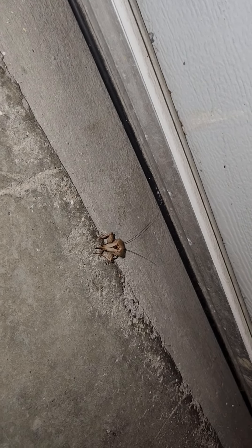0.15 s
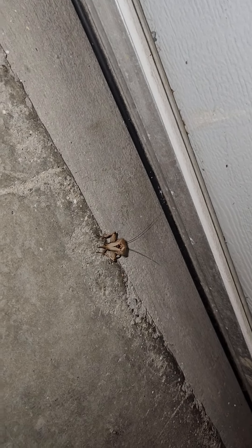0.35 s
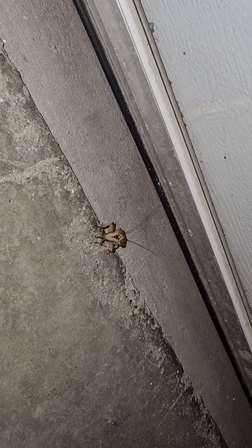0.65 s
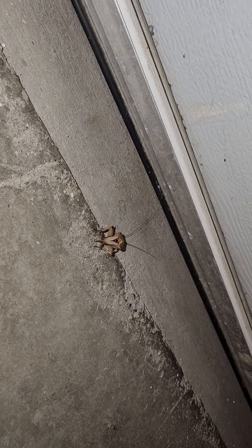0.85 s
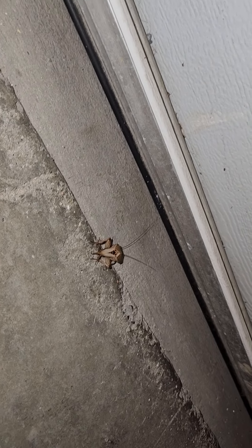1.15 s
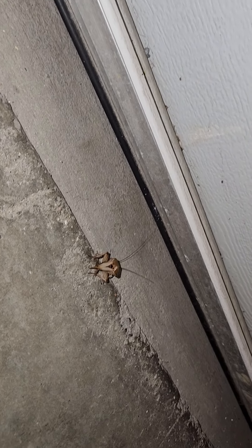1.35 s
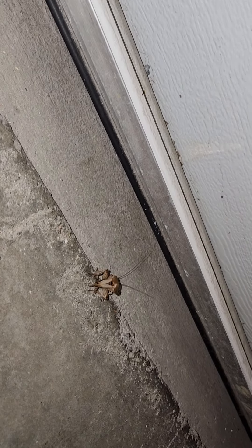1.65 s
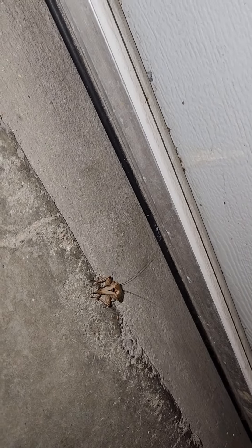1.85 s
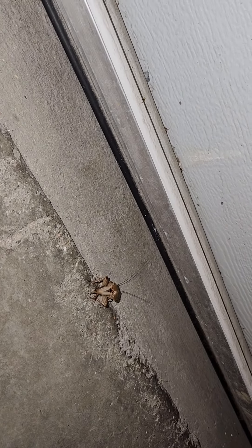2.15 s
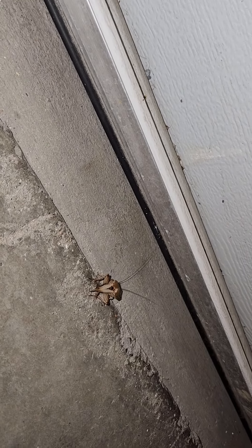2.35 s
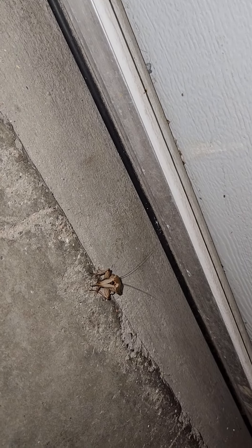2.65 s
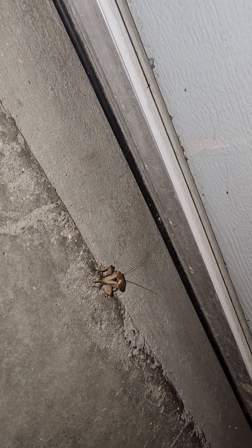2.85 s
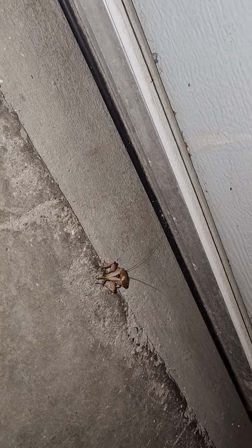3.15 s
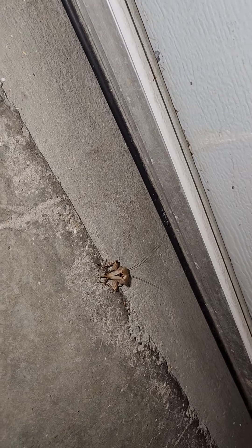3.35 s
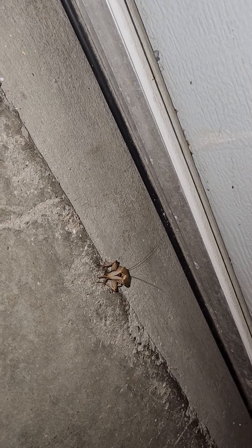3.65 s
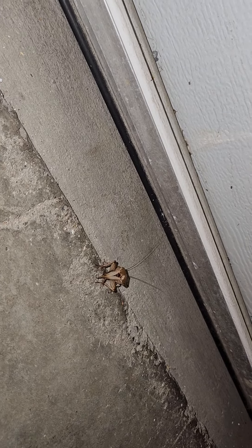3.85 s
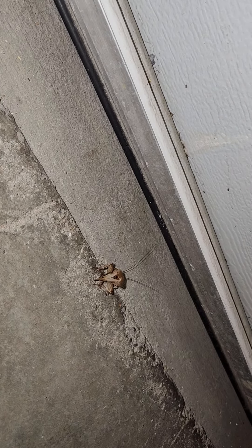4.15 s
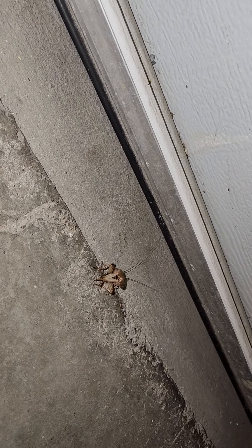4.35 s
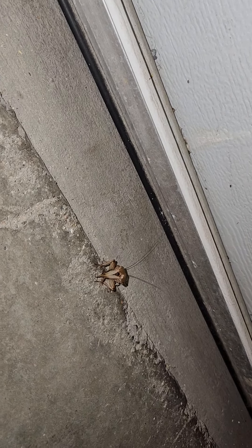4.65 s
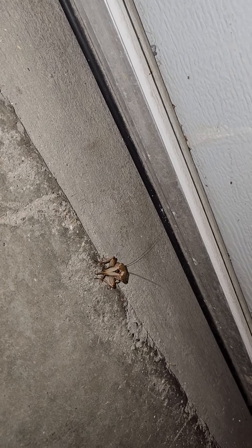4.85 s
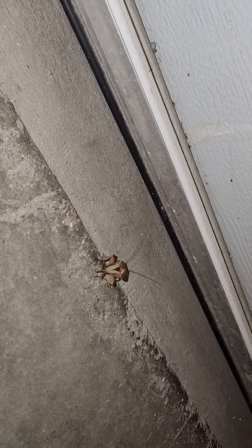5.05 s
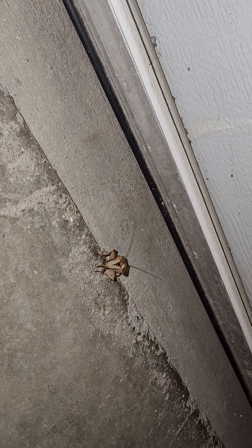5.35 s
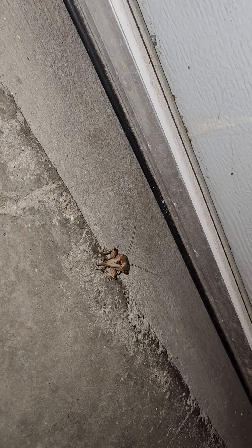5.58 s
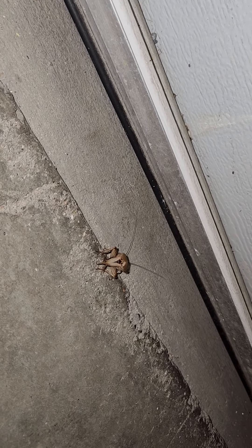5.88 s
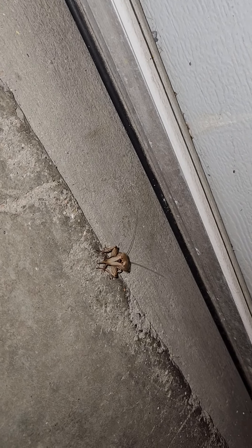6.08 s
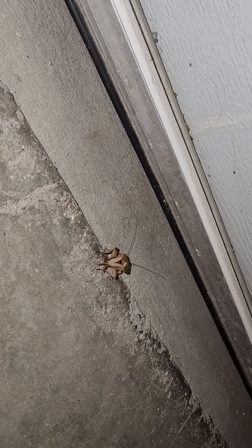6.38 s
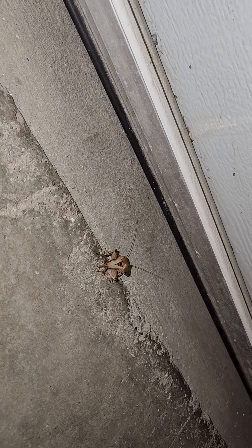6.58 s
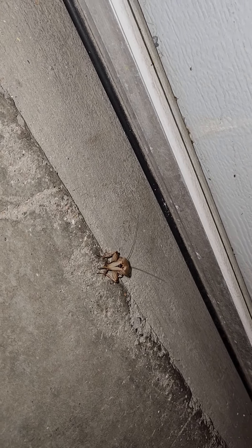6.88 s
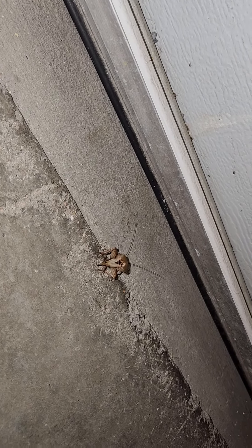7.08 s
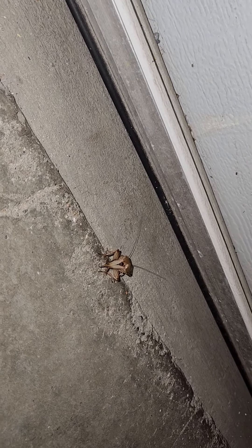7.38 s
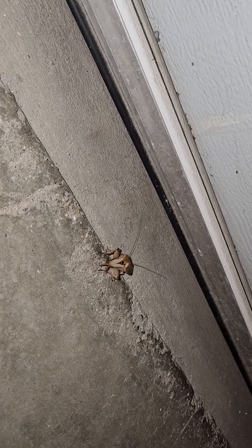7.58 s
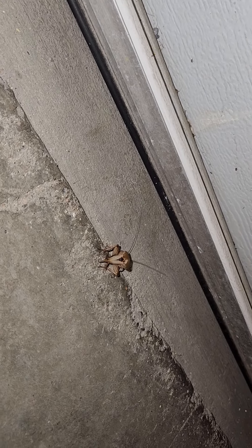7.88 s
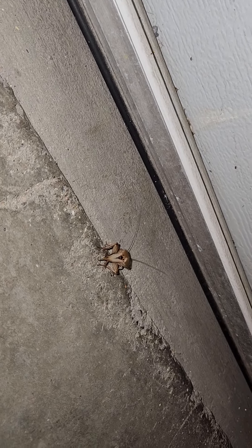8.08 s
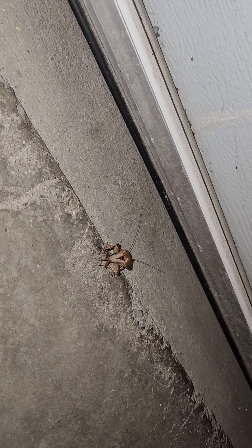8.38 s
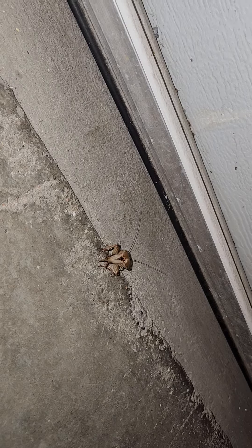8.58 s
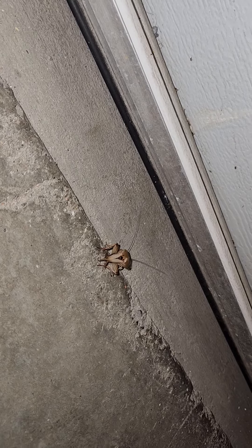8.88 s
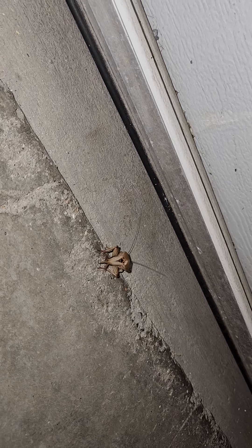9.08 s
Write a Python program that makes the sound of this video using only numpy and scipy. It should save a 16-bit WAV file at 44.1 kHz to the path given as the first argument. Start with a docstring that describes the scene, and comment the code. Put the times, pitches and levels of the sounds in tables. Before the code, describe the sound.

Steady, high cricket chirps ring out indoors at close range, with dull room noise and a few soft low bumps underneath.

```python
"""Bright, ringing cricket chirps, about five a second, close to a hand-held stereo microphone.
The cricket sits on a concrete floor by a door frame. Each chirp is a faint opening scrape, then four
to six closings of the wings: a scraper runs along a file and sets the wing ringing near 5.2 kHz.
The hard room rings on between chirps. Underneath lie dull room noise, a motor's hum,
a few low bumps and one faint far whistle."""
import sys
import numpy as np
from scipy import signal
from scipy.fft import rfft, irfft, next_fast_len
from scipy.io import wavfile

SR = 44100
rng = np.random.default_rng(int(sys.argv[2]) if len(sys.argv) > 2 else 0)


def store_wav(level_fs):
    """Save 16-bit WAV to argv[1]."""
    pcm = np.round(np.clip(np.atleast_2d(level_fs), -1, 1) * 32767)
    wavfile.write(sys.argv[1], SR, pcm.T.astype(np.int16))


N = 407043
FFT_SIZE = next_fast_len(N, real=True)
FFT_HZ = np.fft.rfftfreq(FFT_SIZE, 1 / SR)
WING_HZ, WING_WIDTH_HZ = 5062, 810  # resonance of the wing
RASP_DB = -32  # base level of the teeth's rasp

# the microphone sways in the beam of the song: t/s, tone gain/dB, lag of the right channel/ms
MIC_SWAY = [(0.2, -6.5, 0.073), (0.85, -6.5, 0.087), (1.85, -7, 0.042), (2.7, -8, 0.048),
            (3.4, -6.5, 0.057), (4.7, -7.5, 0.055), (5.6, -6.5, .065), (9.2, -6.5, 0.068)]


def from_db(db):
    """Decibels to gain."""
    return 10 ** (np.asarray(db) / 20)


def rms_one(x):
    """Scale to rms 1."""
    return x / np.sqrt(np.mean(np.abs(x) ** 2) + 1e-20)


def panned(x, db):
    """Left and right, `db` apart."""
    return np.array([x * from_db(db / 2), x * from_db(-db / 2)])


def at_hz(curve, hz):
    """Read a curve on a log-frequency axis."""
    knots_hz, values = np.transpose(curve)
    return np.interp(np.log(np.maximum(hz, 1)), np.log(knots_hz), values)


def colour(x, spectrum, channel_gain=1):
    """Shape white noise at equal power, then apply a gain per channel and frequency."""
    shape = rms_one(from_db(at_hz(spectrum, FFT_HZ)))
    return irfft(rfft(x, FFT_SIZE) * shape * channel_gain, FFT_SIZE)[..., :N]


def drift(rate):
    """A random wander of rms 1 that takes a new value `rate` times a second."""
    place = np.arange(N) * rate / SR
    values = rng.standard_normal(int(place[-1]) + 2)
    return rms_one(np.interp(place, np.arange(len(values)), values))


def phase_of(hz):
    """Running phase of a moving frequency."""
    return 2 * np.pi * np.cumsum(hz) / SR


def span(middle_s, length_s):
    """The samples of a short event, and how far along it each one is (0-1)."""
    at = np.arange(int((middle_s - length_s / 2) * SR), int((middle_s + length_s / 2) * SR))
    inside = (at >= 0) & (at < N)
    return at[inside], np.linspace(0, 1, len(at))[inside]


def room_tone(level_db=-47):
    """A bed of dull noise, centred in the bass and wide higher up."""
    # spectrum of the room noise: f/Hz, relative density/dB
    spectrum = [(20, -18.5), (45, -10.5), (62, -3), (95, -1), (165, -10.5), (260, -12.5), (420, -16.5),
                (650, -25), (1000, -33), (1500, -32), (2200, -47), (3200, -65), (8000, -49), (16000, -65)]
    # likeness of left and right: f/Hz, correlation
    likeness = [(60, 0.97), (150, 0.99), (300, 0.79), (500, 0.3), (800, 0.038), (16000, 0)]
    alike = at_hz(likeness, FFT_HZ)
    mid_side_gain = np.sqrt(np.array([1 + alike, 1 - alike]) / 2)
    mid, side = colour(rng.standard_normal((2, N)), spectrum, mid_side_gain)
    return from_db(level_db) * np.array([mid + side, mid - side])


def motor_hum(waver=0.33, wander_hz=14):
    """A motor's steady partials, each wavering a little in pitch and level."""
    # motor partials: f/Hz, rms level/dB, pitch wander/Hz, left minus right/dB
    partials = [(91.1, -50, 3.21, 0.5), (116.8, -54, 3.08, 2), (141.9, -58, 2.5, 2.5), (214, -66.5, 1.6, 3),
                (268.8, -56.5, 2.1, 2), (284.8, -56, 1.76, 1), (357.4, -62.5, 2.185, 8),
                (486, -73.5, 3.74, 4), (562, -81, 1.34, -12), (1250, -83, 2.26, 7), (1480, -82.5, 2.5, -24),
                (1940, -87, 3.9, 2), (3555, -88, 20, 14)]
    step = 5  # the partials are low, so every fifth sample carries them
    t = np.arange(0, N, step) / SR
    knots, out = np.arange(int(t[-1] * wander_hz) + 2), 0
    for hz, db, width_hz, pan_db in partials:
        wander = np.interp(t * wander_hz, knots, rng.standard_normal(len(knots)))
        swell = np.interp(t * wander_hz, knots, rng.standard_normal(len(knots)))
        partial = (1 + waver * swell) * np.sin(step * phase_of(hz + width_hz * wander))
        out = out + panned(from_db(db) * rms_one(partial), pan_db)
    return signal.resample_poly(out, step, 1, axis=1)[:, :N]


def low_bumps(pitch_spread=0.2):
    """Soft swells of rumble, each a low tone of unsteady pitch."""
    # bumps: middle t/s, rms level at the crest/dB, f/Hz, length/s
    swells = [(1.713, -41, 70, .35), (1.93, -39, 75.4, 0.38), (2.146, -40.5, 71.3, 0.33),
              (2.28, -44, 36, 0.29), (5.502, -41.5, 73.4, .55), (6.882, -45, 66.3, 0.63),
              (9.169, -43.5, 66.5, 0.27)]
    out, wander = np.zeros(N), 1 + pitch_spread * drift(35)
    for s, db, hz, length in swells:
        at, along = span(s, length)
        swell = from_db(db) * np.sin(np.pi * along) ** 2
        out[at] += swell * np.sqrt(2) * np.sin(phase_of(hz * wander[at]))
    return out


def far_whistle(start_s=1.07, attack_s=0.054, hold_s=0.17, release_s=0.2, level_db=-69,
                note_hz=1808, scoop_hz=110, settle_s=0.043, blur_hz=22, flutter=0.48):
    """A faint note that drops onto its pitch, holds and fades, blurred by distance."""
    length = attack_s + hold_s + release_s
    at, along = span(start_s + length / 2, length)
    t, out = along * length, np.zeros(N)
    envelope = np.interp(t, [0, attack_s, attack_s + hold_s, length], [0, 1, 1, 0])
    level = from_db(level_db) * envelope * (1 + flutter * drift(70.5)[at])
    hz = note_hz + scoop_hz * np.exp(-t / settle_s) + blur_hz * drift(200)[at]
    out[at] = level * np.sqrt(2) * np.sin(phase_of(hz))
    return out


def room_reverb(x, frame_db=-19, frame_s=0.011, early_db=-22, early_s=0.017, tail_db=-16.5):
    """Echoes off the door frame, then the nearest walls, then a tail that rings longest near 5 kHz."""
    # ring of the hard room: f/Hz, t60/s
    t60 = [(1000, 0.13), (5200, 1), (8000, 0.3), (11000, 0.41), (13000, 0.55), (16000, 0.25)]
    t = np.arange(SR) / SR
    hz = np.fft.rfftfreq(len(t), 1 / SR)
    white = rfft(rng.standard_normal((2, len(t))))
    edges, tail = np.linspace(0, SR / 2, 12), 0
    for low, high in zip(edges, edges[1:]):
        band = irfft(white * ((hz >= low) & (hz < high)), len(t))
        tail = tail + band * from_db(-60 * t / at_hz(t60, (low + high) / 2))
    frame = rng.standard_normal(tail.shape) * np.exp(-t / frame_s) * (t > .0018)
    early = rng.standard_normal(tail.shape) * np.exp(-t / early_s) * (t > .007)
    song_band, response = np.abs(hz - WING_HZ) < 150, 0
    for part, db in ((frame, frame_db), (early, early_db), (tail * (t > .012), tail_db)):
        # each echo's gain is set at the pitch of the song
        strength = np.sqrt(np.mean(np.abs(rfft(part)[:, song_band]) ** 2, axis=1, keepdims=True))
        response = response + from_db(db) * part / strength
    # the song is already under way: one chirp of pre-roll leaves the room ringing
    pre_roll = x[:, int(.15 * SR):int(.27 * SR)]
    wet = signal.fftconvolve(np.hstack([pre_roll, x]), response, axes=1)
    return wet[:, pre_roll.shape[1]:][:, :N]


def wall_slaps(x):
    """Single slaps off the far walls, reaching left and right at slightly different times."""
    # wall echoes: delay/s, gain/dB
    slaps = [(0.038, -22), (.0598, -33.5)]
    out = np.zeros((2, N))
    for delay, db in slaps:
        lags = ((delay + rng.uniform(0, .0003, 2)) * SR).astype(int)
        for side, lag in enumerate(lags):
            out[side, lag:] += from_db(db) * x[side, :-lag]
    return out


def chirps():
    """One row per chirp: t/s, strokes, gain from the microphone's sway/dB."""
    # rhythm of the song: first stroke t/s, number of strokes
    rhythm = [(0.1966, 5), (0.4052, 5), (0.6416, 5), (0.8543, 5), (1.0598, 5), (1.261, 5), (1.4615, 5),
              (1.6554, 5), (1.8708, 5), (2.1001, 5), (2.4683, 4), (2.7842, 4), (2.977, 5), (3.1801, 5),
              (3.4032, 5), (3.6039, 5), (3.7943, 5), (3.9884, 5), (4.1854, 6), (4.3839, 5), (4.585, 5),
              (4.7758, 5), (4.971, 5), (5.1629, 5), (5.346, 5), (5.5484, 5), (5.7409, 5), (5.9374, 5),
              (6.1439, 5), (6.349, 5), (6.5446, 5), (6.7356, 5), (6.9463, 5), (7.1461, 5), (7.3382, 5),
              (7.538, 5), (7.7327, 6), (7.9635, 5), (8.1573, 6), (8.3726, 5), (8.5818, 5), (8.7666, 6),
              (8.9677, 5), (9.1768, 5)]
    s, db, _ = np.transpose(MIC_SWAY)
    return [(start, count, np.interp(start, s, db)) for start, count in rhythm]


def strokes(spacing_s=.0108, slowing=0.079, growth_db=1.5):
    """Wing closings slow down and press harder through a chirp: t/s, drive/dB, rasp/dB, index."""
    rows = []
    for start, count, db in chirps():
        place = np.arange(count)
        lag = place + slowing * place * (place - 1) / 2
        length = spacing_s * place[-1]
        for k in place:
            effort_db = growth_db * (k / place[-1] - .5)
            rows.append((start + length * lag[k] / lag[-1], db + effort_db, RASP_DB + effort_db, k))
    return rows


def wing_opening(level_db=-36, ahead_s=0.0079, length_s=0.014, attack_s=.003, fade_db=9, uneven_db=5.5):
    """The wings part with a faint tick that trails off in a scrape just before the first stroke."""
    # spectrum of the tick: f/Hz, relative density/dB
    spectrum = [(1000, -23), (3000, -14), (4300, 2.5), (5250, 14.5), (6200, 4), (7500, 4), (9400, -13),
                (11000, -24), (15700, -19)]
    rows, touch = chirps(), np.zeros(N)
    chances = rng.standard_normal((len(rows), 2)).clip(-1.5, 1.5)
    for (start, _, db), (timing, accent) in zip(rows, chances):
        at, along = span(start - ahead_s + 0.0011 * timing, length_s)
        attack = np.minimum(along * length_s / attack_s, 1)
        touch[at] = attack * from_db(db + level_db + 2 * accent - fade_db * along)
    scrape = touch * from_db(uneven_db * drift(400)) * rng.standard_normal((2, N))
    return colour(scrape, spectrum) * from_db([[-1.5], [1.5]])  # leans right


def file_brush(drive_db=-24, rasp_db=-15, ahead_s=0.0082, length_s=0.0033, tooth_hz=5150):
    """One beat before a chirp the scraper grazes the file; returns wing drive and rasp envelope."""
    drive, rasp = np.zeros(N, complex), np.zeros(N)
    for start, _, db in chirps():
        accent, detune, timing = rng.standard_normal(3)
        at, along = span(start - ahead_s + 0.0011 * timing, length_s)
        hz = np.full(len(at), tooth_hz + 120 * detune)
        press = from_db(3 * accent) * np.sin(np.pi * along)
        drive[at] = from_db(db + drive_db) * press * np.exp(1j * phase_of(hz))
        rasp[at] = from_db(RASP_DB + rasp_db) * press
    return drive, rasp


def scraper(tooth_hz=5234, first_s=0.0082, later_s=0.0075, first_sag_hz=480, later_sag_hz=380,
            slip_width=0.066, slip_loss_db=4.5):
    """The scraper strikes the file's teeth at each closing; returns wing drive and rasp envelope."""
    rows, drive, rasp = strokes(), np.zeros(N, complex), np.zeros(N)
    chances = rng.standard_normal((len(rows), 8)).clip(-1.6, 1.6)
    for (s, db, rasp_db, k), chance in zip(rows, chances):
        stretch, detune, stumble, stumble_shift, jump, jump_shift, accent, roughness = chance
        if k == 0:  # the first stroke glides cleanly down
            length = first_s
            at, along = span(s - .0003, length)
            hz = tooth_hz + 50 - first_sag_hz * along ** 4
            skip_rad = 0
            press = from_db(1.3) * np.abs(np.sin(np.pi * along)) ** 1.16
            rasp_db -= 11
        else:  # later ones stumble early, then jump ahead of the wing past the middle and lose grip
            length = later_s * np.exp(.12 * stretch)
            at, along = span(s + .0007, length)
            hz = tooth_hz + 25 * detune - later_sag_hz * along ** 3
            stumbled = (1 + np.tanh((along - 0.15 - 0.13 * stumble_shift) / slip_width)) / 2
            jumped = (1 + np.tanh((along - 0.57 - 0.037 * jump_shift) / slip_width)) / 2
            skip_rad = 0.91 * stumble * stumbled + (1.68 + 0.87 * jump) * jumped
            press = np.abs(np.sin(np.pi * along ** 0.78)) * from_db(1.53 - slip_loss_db * jumped)
        force = from_db(db + 0.47 * accent) * np.sqrt(later_s / length) * press
        drive[at] += force * np.exp(1j * (phase_of(hz) + skip_rad + rng.uniform(0, 2 * np.pi)))
        # the rasp is there from first contact, before the wing has rung up
        rasp[at - round(.0009 * SR)] += from_db(rasp_db + 1.4 * roughness) * press ** 0.065
    return drive, rasp


def tooth_rasp(envelope, grain_db=3, alike=0.25):
    """Uneven teeth add a gritty noise, in grains under a millisecond long."""
    # rasp of the file teeth: f/Hz, relative density/dB
    spectrum = [(900, -13.5), (2200, -19.5), (2800, -14.5), (3400, -17), (4400, -1), (5300, -6.5),
                (6400, 6.5), (7800, -1), (9400, -14), (10600, -6.5), (11600, -3.5), (12800, -9),
                (14400, -3), (15700, 4)]
    # the two microphone ports colour the rasp differently: f/Hz, left minus right/dB
    ports = [(1500, -1), (2900, 3), (4600, 2), (6200, 12), (7700, -13.5), (9200, 5.5), (10600, 5.5),
             (11600, -4), (14500, -3), (15700, -1)]
    noise = np.sqrt(alike) * rng.standard_normal(N) + np.sqrt(1 - alike) * rng.standard_normal((2, N))
    grains = rms_one(from_db(grain_db * drift(1500)))
    return colour(noise * envelope * grains, spectrum, panned(0.9, at_hz(ports, FFT_HZ)))


def wing_ring(drive, jitter_rad=0.11, pan_db=-3.5, overtone_db=-38):
    """The wing resonates to the tooth strikes; returns its tone and its two weak overtones."""
    radius = np.exp(-np.pi * WING_WIDTH_HZ / SR)
    pole = radius * np.exp(2j * np.pi * WING_HZ / SR)
    jittered = drive * np.exp(1j * jitter_rad * drift(1800))
    wing = signal.lfilter([1 - radius], [1, -pole], jittered + 1e-18)
    s, _, lag_ms = np.transpose(MIC_SWAY)
    right_lag_s = np.interp(np.arange(N) / SR, s, lag_ms) / 1000
    phase = np.angle(wing) - 2 * np.pi * WING_HZ * np.array([np.zeros(N), right_lag_s])
    swing = panned(np.abs(wing), pan_db)
    overtones = from_db(overtone_db) * (np.cos(2 * phase) + np.cos(3 * phase))
    return swing * np.cos(phase), swing * overtones


def cricket(rasp_send_db=6, overtone_send_db=8.5):
    """The tone is beamed at the microphone; rasp and overtones spread, so they feed the room more."""
    stroke_drive, stroke_rasp = scraper()
    brush_drive, brush_rasp = file_brush()
    tone, overtones = wing_ring(stroke_drive + brush_drive)
    rasp = tooth_rasp(stroke_rasp + brush_rasp) + wing_opening()
    direct = tone + overtones + rasp
    send = tone + from_db(overtone_send_db) * overtones + from_db(rasp_send_db) * rasp
    song = direct + room_reverb(send) + wall_slaps(direct)
    # with its echoes, each channel keeps the level of the direct sound
    return song * direct.std(axis=1, keepdims=True) / song.std(axis=1, keepdims=True)


def scene():
    """The cricket up front, over the quiet background of the room."""
    return cricket() + room_tone() + motor_hum() + low_bumps() + far_whistle()


def record(dry):
    """A steep low-pass cuts the top at 15.8 kHz."""
    return signal.sosfiltfilt(signal.ellip(10, .05, 60, 15800, fs=SR, output="sos"), dry)


dry = scene()
out = record(dry)
store_wav(out)
```